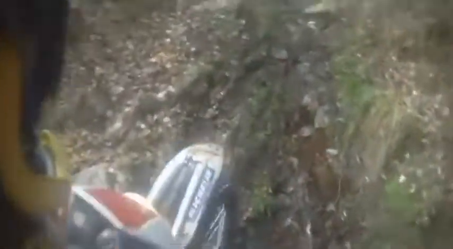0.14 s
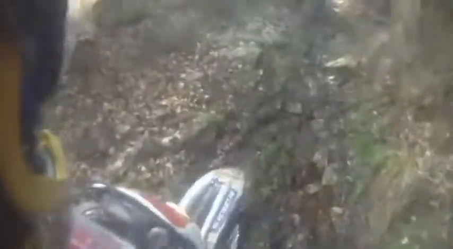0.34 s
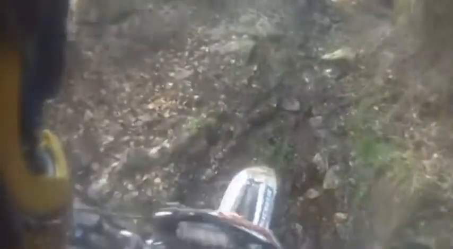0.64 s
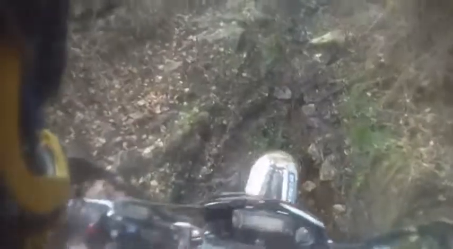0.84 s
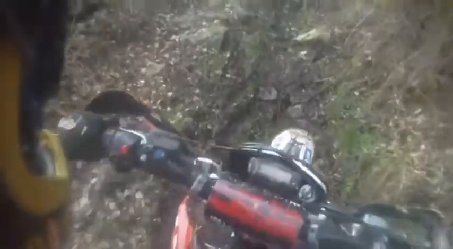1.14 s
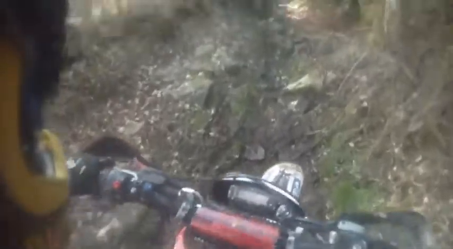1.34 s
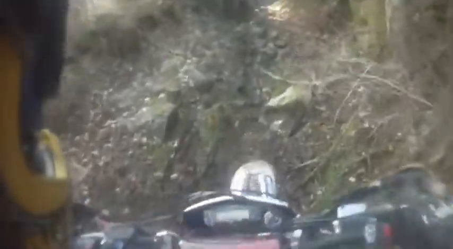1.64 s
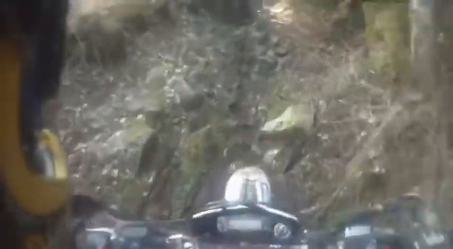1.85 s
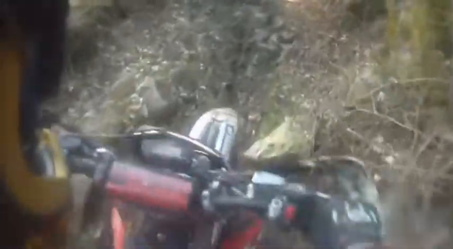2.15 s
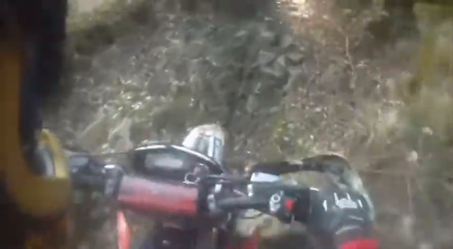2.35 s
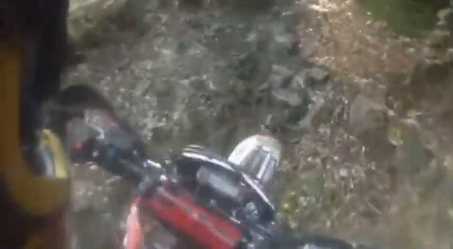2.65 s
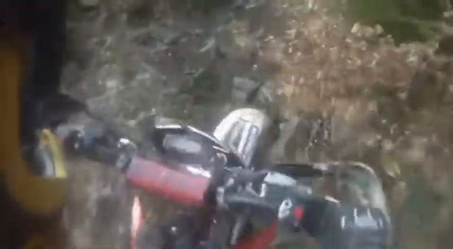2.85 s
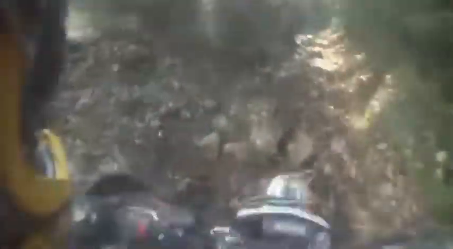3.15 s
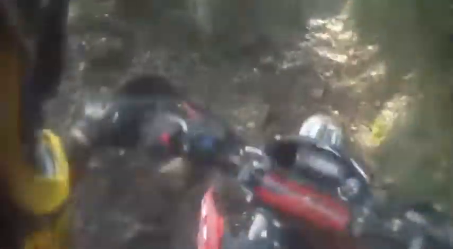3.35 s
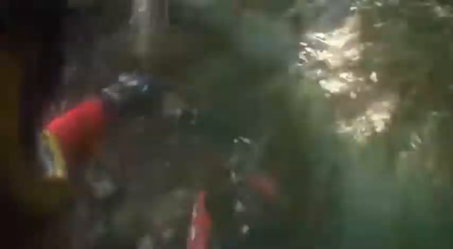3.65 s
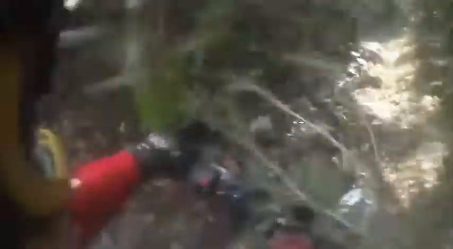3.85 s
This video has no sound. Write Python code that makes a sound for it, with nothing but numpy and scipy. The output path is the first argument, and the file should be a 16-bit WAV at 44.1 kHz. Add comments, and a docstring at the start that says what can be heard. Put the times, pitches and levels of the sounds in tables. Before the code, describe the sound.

Dirt bike climbing at low revs with a rattly engine, then sharp close knocks as it tips.

```python
"""Enduro bike on a rocky trail

A one-cylinder bike putters uphill at low revs, heard from a camera in a case on the rider's helmet.
Each firing gives a soft exhaust thump and a rasp of engine clatter, coloured by the case.
As the bike tips, something scrapes and knocks on the case, ending in two hard clacks."""
import sys
import numpy as np
from scipy import signal
from scipy.fft import rfft, irfft, next_fast_len
from scipy.io import wavfile

SR = 44100
rng = np.random.default_rng(int(sys.argv[2]) if len(sys.argv) > 2 else 0)


def generate_wav(sig):
    """Save sig (samples, or channels by samples) to the path in sys.argv[1] as 16-bit PCM at SR."""
    pcm = np.round(np.clip(np.atleast_2d(sig).T, -1, 1) * 32767).astype(np.int16)
    wavfile.write(sys.argv[1], SR, pcm)


N = 176400

# How the exhaust and the engine clatter rise and fall: time_s, level_db
EXHAUST_LEVELS = [(0.22, -66), (0.25, -50), (.32, -53.5), (0.38, -68), (.55, -68), (0.59, -52.5),
                  (.67, -52.5), (.73, -57), (0.92, -58), (1.08, -53), (1.35, -50.5), (1.48, -54),
                  (1.65, -50.5), (2.0, -51.5), (2.22, -54), (2.44, -49.5), (2.62, -50.5), (2.7, -53),
                  (2.94, -54), (3.2, -47), (3.33, -48), (3.47, -54), (3.66, -51), (3.8, -53), (3.89, -65),
                  (4, -57)]
CLATTER_LEVELS = [(0, -47), (.12, -54.5), (.235, -50), (.25, -44), (.33, -43), (.36, -48.5), (.55, -49.5),
                  (.67, -44.5), (.8, -43.5), (.98, -45.5), (1.33, -43), (1.45, -46), (1.8, -42),
                  (2.17, -45.5), (2.4, -46.5), (2.44, -43), (3.0, -45.5), (3.15, -41.5), (3.7, -42.5),
                  (4, -42.5)]
# The tone of clatter heard through the case, and of a knock on it: pitch_hz, gain_db
CLATTER_TONE = [(100, -31), (400, -20), (600, -17), (720, -20.5), (1000, -18), (1350, -19), (1550, -8.5),
                (1720, 0), (1900, -5), (2120, -8.5), (2430, -1), (2750, -4.5), (3100, -4), (3480, 1),
                (3750, -2.5), (4050, -9), (4600, -7), (5700, -9), (6250, -15), (6850, -4), (7350, -5),
                (8100, -12), (9700, -14), (11200, -23.5), (13500, -29), (15300, -36)]
KNOCK_TONE = [(60, -26), (250, -25), (500, -26.5), (720, -30.5), (1100, -23), (1400, -10), (1650, 3),
              (2200, -1), (3200, -1.5), (3750, 0), (4100, -10), (5400, -16.5), (6800, -17), (8500, -40),
              (15000, -58)]


def amp(db):
    """Turn decibels into a number to multiply by."""
    return 10 ** (np.asarray(db) / 20)


def unit(x):
    """Scale a sound so that its average power is 1."""
    return x / np.sqrt(np.mean(x ** 2) + 1e-20)


def curve(rows):
    """Join (time_s, value) rows with straight lines, giving one value per sample."""
    return np.interp(np.arange(N) / SR, *np.transpose(rows))


def colour(x, points):
    """Shape the tone with (pitch_hz, gain_db) rows; white noise keeps its overall power."""
    size = 8192
    hz, db = np.transpose(points)
    gain = amp(np.interp(np.log(np.fft.rfftfreq(size, 1 / SR) + 1), np.log(hz), db))
    # Fold the filter so that it never rings before the sound arrives.
    folded = irfft(np.log(gain))
    folded[1:size // 2] *= 2
    folded[size // 2 + 1:] = 0
    response = irfft(np.exp(rfft(folded)))
    return signal.fftconvolve(x, response / np.linalg.norm(response))[:len(x)]


def grains(per_second, spread_db):
    """Tiny impacts of uneven size come at random moments."""
    hits = (rng.random(N) < per_second / SR) * np.sign(rng.standard_normal(N))
    return unit(hits * amp(spread_db * rng.standard_normal(N)))


def crank():
    """The engine fires once a turn: give the running count of turns and the firing times."""
    speed = [(0.0, 28.21), (0.295, 36.25), (0.5, 31.02), (0.6, 33.15), (0.72, 41.62), (0.83, 45.75),
             (0.97, 39.26), (1.09, 32.99), (1.14, 31.64), (1.36, 36.03), (1.52, 31.64), (1.69, 35.14),
             (1.8, 35.32), (1.92, 36.22), (2.07, 34.49), (2.17, 35.57), (2.24, 33.28), (2.4, 31.76),
             (2.65, 39.34), (2.77, 35.64), (2.93, 33.93), (3.06, 31.18), (3.26, 37.35), (3.45, 41.4),
             (3.53, 37.07), (3.65, 38.6), (4.0, 38.85)]  # engine speed: time_s, firings_per_s
    turns = np.cumsum(curve(speed)) / SR
    return turns, np.interp(np.arange(1, int(turns[-1]) + 1), turns, np.arange(N) / SR)


def exhaust(firings):
    """Each firing sends a few short pressure waves down the pipe."""
    pipe_waves = [(-.009, 275, .0026, -8), (0, 288, .0028, 0), (.0009, 503, .0028, -1.7),
                  (.007, 250, .003, -13)]  # the waves of one firing: delay_s, pitch_hz, width_s, level_db
    size, scatter_db, jitter_s = 2048, .7, .00004
    chance = rng.standard_normal((len(firings), len(pipe_waves) + 1))
    index = (firings * SR).astype(int)[:, None] + np.arange(size) - size // 2
    t = index / SR - firings[:, None] - jitter_s * chance[:, -1:]
    thumps = np.zeros_like(t)
    for k, (delay, hz, width, db) in enumerate(pipe_waves):
        swell = amp(db + scatter_db * chance[:, k, None]) * np.exp(-.5 * ((t - delay) / width) ** 2)
        thumps += swell * np.cos(2 * np.pi * hz * (t - delay))
    putter = np.bincount(np.clip(index, 0, N).ravel(), thumps.ravel(), N + 1)[:N]  # add each at its time
    return putter * amp(curve(EXHAUST_LEVELS))


def clatter(turns, firings):
    """Rasp and fine metal ticks swell with every firing; a hiss lies over them."""
    hiss_levels = [(0, -62), (.7, -62.5), (2.3, -57), (3.2, -58), (3.46, -45), (3.6, -49), (3.72, -52),
                   (4, -58)]  # strength of the high hiss: time_s, level_db
    hiss_tone = [(1000, -57), (3500, -13), (5500, 0), (6250, -5), (7200, 7), (8300, -9.5), (10000, -7),
                 (12500, -15), (15000, -55)]  # its tone: pitch_hz, gain_db
    scatter_db, depth_db, lead_turns = 1.18, 1.5, .13
    uneven_db = scatter_db * np.interp(np.arange(N) / SR, firings, rng.standard_normal(len(firings)))
    beat_db = depth_db * np.cos(2 * np.pi * (turns + lead_turns))
    grit = rng.standard_normal(N) + amp(-5.5) * grains(per_second=450, spread_db=1.5)
    rasp = unit(grit * amp(beat_db + uneven_db)) * amp(curve(CLATTER_LEVELS) - 3)
    hiss = colour(rng.standard_normal(N), hiss_tone) * amp(curve(hiss_levels))
    return colour(rasp, CLATTER_TONE) + hiss


def taps(turns):
    """Piston and gears tap at about the same points of each turn and ring the metal."""
    tap_points = [(-.3, -3.5), (-.06, -6.5), (.1, -9.5)]  # taps around each firing: offset_turns, level_db
    metal_notes = [(1737, -4.5, 0.044), (1888, 2, 0.072), (2506, -5, 0.054), (3380, 0, 0.049),
                   (3510, 0, 0.087), (3654, -2, 0.095), (4454, -1.5, 0.039), (7390, -7, 0.018),
                   (7330, -6.5, 0.033)]  # the ringing metal: pitch_hz, level_db, fade_s (time to drop 60 dB)
    size, scatter_db, jitter_turns = 1400, 3, .025
    t, out = np.arange(size) / SR, np.zeros(N + size)
    hz, level, fade_s = np.transpose(metal_notes)[:, :, None]
    notes = amp(level - 60 * t / fade_s) * np.sin(2 * np.pi * hz * t)
    for turn in range(1, int(turns[-1])):
        for offset, db in tap_points:
            start = np.searchsorted(turns, turn + offset + jitter_turns * rng.standard_normal())
            ring = np.mean(rng.uniform(-1.01, 1, hz.shape) * notes, axis=0)
            out[start:start + size] += amp(db + scatter_db * rng.standard_normal()) * ring
    return .5 * unit(out[:N]) * amp(curve(CLATTER_LEVELS) - 4.5)


def pops():
    """Hard firings bark as the throttle opens: a burst of rasp with a quickly falling ring."""
    hard_firings = [(0.2437, -40.5), (0.2739, -39), (0.3005, -42), (0.33, -50), (.606, -42), (.66, -40.5),
                    (.687, -48), (.712, -45)]  # one bark a row: start_s, level_db
    size, attack_s, fade_s = 2048, .0041, .046
    from_hz, to_hz, fall_s = 2820, 1683, .00219
    t, out = np.arange(size) / SR, np.zeros(N)
    fade = (1 - np.exp(-t / attack_s)) * amp(-60 * t / fade_s)
    pitch_hz = to_hz + (from_hz - to_hz) * np.exp(-t / fall_s)
    ring = 1.96 * np.sin(2 * np.pi * np.cumsum(pitch_hz) / SR)
    for start_s, db in hard_firings:
        rasp = colour(rng.standard_normal(size), CLATTER_TONE)
        out[round(start_s * SR):][:size] += amp(db) * fade * (ring + rasp)
    return out


def drone(turns):
    """Two clean notes, at 6 and 9 times the firing rate, swell when the engine pulls."""
    note_levels = [(.6, -85, -90), (.8, -63, -85), (1.15, -80, -70), (1.8, -71, -78), (2.3, -78, -80),
                   (2.6, -69, -80), (2.95, -76, -80), (3.1, -64, -63), (3.22, -59, -66), (3.4, -58, -80),
                   (3.52, -66, -85), (3.72, -65, -85), (3.87, -85, -90)]  # strength of the two notes: time_s, low_note_db, high_note_db
    levels, lead_turns = np.array(note_levels), .012
    return sum(amp(curve(levels[:, [0, column]])) * np.cos(2 * np.pi * multiple * (turns + lead_turns))
               for column, multiple in enumerate((6, 9), 1))


def burble():
    """Swirling gas rings the pipe, more when the engine pulls."""
    pipe_tone = [(100, -46), (185, -15), (220, -10), (300, -7), (345, -6), (400, -10), (490, -17),
                 (580, -10), (750, -33)]  # tone of the gas flow: pitch_hz, gain_db
    return unit(colour(rng.standard_normal(N), pipe_tone)) * amp(curve(EXHAUST_LEVELS) - 18)


def knocks():
    """Each contact is a short crunch that rings the case; hard ones add a bright crack."""
    contacts = [(3.509, -19, 0.014, 0.32), (3.574, -19.5, 0.006, 0.6), (3.728, -9, 0.015, 0.03),
                (3.737, -23, .01, .1), (3.7483, -21, 0.025, .05), (3.7551, -15, 0.012, 0.08),
                (3.7612, -17, 0.032, 0.02), (3.8224, -18, 0.034, 0.02), (3.829, -4.5, 0.019, 0),
                (3.8372, -13, 0.025, 0.05), (3.8454, -14.5, 0.028, 0.06), (3.8614, -21.5, 0.032, 0.08),
                (3.877, -24, 0.028, 0), (3.9645, -4, 0.022, 0.9), (3.9747, -4.5, 0.02, .3),
                (3.995, -26, 0.064, 0)]  # hits on the case: start_s, level_db, fade_s, hardness (0 to 1)
    case_notes = [(1778, -3, 0.034), (2680, -9, 0.024), (3160, 9, 0.024), (3377, 12.5, 0.02),
                  (3642, 7.5, 0.046), (4420, -0.5, 0.028)]  # the ringing case: pitch_hz, level_db, fade_s
    crack_tone = [(100, -38), (1000, -64), (1700, -17), (2600, -10), (3400, -7.5), (4100, -14),
                  (5000, -13.5), (6700, -14.5), (7500, -2.5), (8300, -7.5), (9500, -16), (10300, -11),
                  (11500, -20.5), (13000, -30), (16000, -36)]  # tone of a hard crack: pitch_hz, gain_db
    size, attack_s, scatter_db, ring_db = 8192, .00036, 5.1, 2
    t, out = np.arange(size) / SR, np.zeros(N + SR)
    rise = 1 - np.exp(-t / attack_s)
    for start_s, db, fade_s, hardness in contacts:
        fade = rise * amp(-60 * t / fade_s)
        ring = np.zeros(size)
        for hz, level, ring_s in case_notes:
            note_db = level + scatter_db * rng.standard_normal() - 60 * t / ring_s
            ring += amp(note_db) * np.sin(2 * np.pi * (hz * t + rng.random()))
        crunch = unit(colour(fade * rng.standard_normal(size), KNOCK_TONE))
        crack = unit(colour(fade * rng.standard_normal(size), crack_tone))
        body = unit(crunch + amp(ring_db) * unit(rise * ring))
        blow = (1 - hardness) * body + hardness * crack
        out[round(start_s * SR):][:size] += amp(db) * fade.std() * blow
    return out[:N]


def scrape():
    """Many tiny slips scrape along the case between the knocks."""
    scrape_levels = [(3.72, -92), (3.735, -31), (3.77, -30.5), (3.81, -36), (3.84, -16.5), (3.87, -37),
                     (3.91, -38.5), (3.945, -40.5), (3.98, -34.5), (4, -25)]  # strength of the scraping: time_s, level_db
    return colour(grains(per_second=900, spread_db=2.5) * amp(curve(scrape_levels)), KNOCK_TONE)


def squeak():
    """One short, rough rub makes the case squeak."""
    squeak_notes = [(1800, -7.5), (2600, -6.5), (3330, -0.5)]  # notes of the rubbed case: pitch_hz, level_db
    peak_s, swell_s, wobbles_per_s = 3.9228, .003, 490
    t, ring = np.arange(N) / SR - peak_s, np.zeros(N)
    for hz, db in squeak_notes:
        wobble = np.interp(np.arange(N) * wobbles_per_s / SR, np.arange(SR), rng.standard_normal(SR))
        ring += amp(db) * np.sin(2 * np.pi * hz * t + wobble)
    return amp(-14.5) * np.exp(-np.abs(t) / swell_s) * ring


def thuds():
    """As the bike goes over, the heavier contacts also give a short, dull bump."""
    bumps = [(3.729, -44.5), (3.757, -47), (3.824, -42.5)]  # one bump a row: start_s, level_db
    bump_tone = [(90, -11), (140, 5.5), (190, -9), (270, -0.5), (380, -7.5), (480, -1.5), (650, -16),
                 (1200, -37)]  # their dull tone: pitch_hz, gain_db
    attack_s, fade_s = .0022, .14
    strength = np.zeros(N)
    for start_s, db in bumps:
        t = np.maximum(np.arange(N) / SR - start_s, 0)
        strength += amp(db - 60 * t / fade_s) * (1 - np.exp(-t / attack_s))
    return colour(strength * rng.standard_normal(N), bump_tone)


def rumble():
    """The ride makes a low rumble under everything else."""
    rumble_levels = [(1.35, -59), (1.55, -60.5), (2.8, -61.5), (3.7, -58), (3.85, -55), (3.89, -57),
                     (3.96, -54.5)]  # strength of the rumble: time_s, level_db
    rumble_tone = [(33, -1), (48, -10), (70, -7), (100, -14), (135, -10.5), (185, -16), (350, -23),
                   (600, -24), (2000, -37)]  # its deep tone: pitch_hz, gain_db
    low_cut = signal.butter(4, 12, "high", fs=SR, output="sos")  # turns down what lies below 12 Hz
    noise = colour(rng.standard_normal(N), rumble_tone)
    return amp(curve(rumble_levels)) * unit(signal.sosfilt(low_cut, noise))


def scene():
    """Engine, ride and knocks add up in one channel."""
    turns, firings = crank()
    engine = exhaust(firings) + drone(turns) + clatter(turns, firings) + taps(turns) + pops()
    return (engine + rumble() + thuds() + knocks() + scrape() + squeak() + burble())[None]


def record(dry):
    """The camera caps the peaks, drops the highest treble and adds a small steady offset."""
    top_hz, offset = 15500, .0056
    size = next_fast_len(N + SR)
    spectrum = rfft(np.clip(dry, -1, 1), size)
    kept = np.fft.rfftfreq(size, 1 / SR) < top_hz
    return offset + irfft(spectrum * kept, size)[:, :N]


dry = scene()
out = record(dry)
generate_wav(out)
```